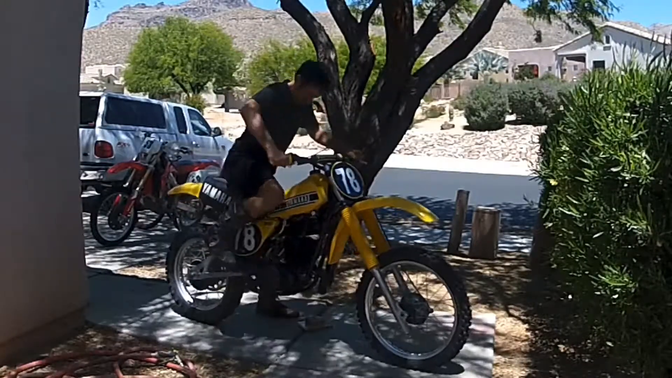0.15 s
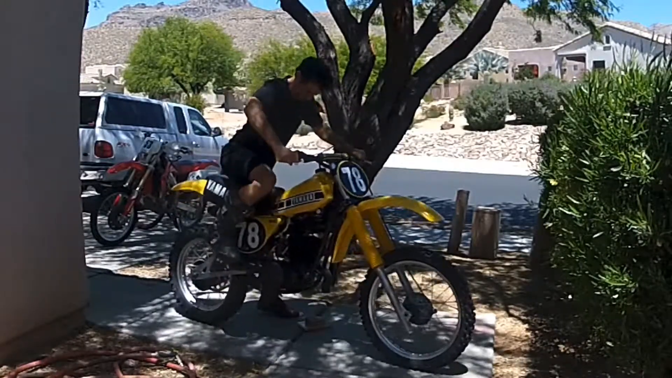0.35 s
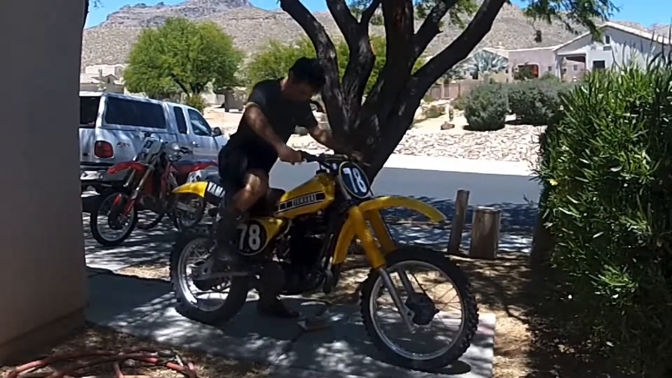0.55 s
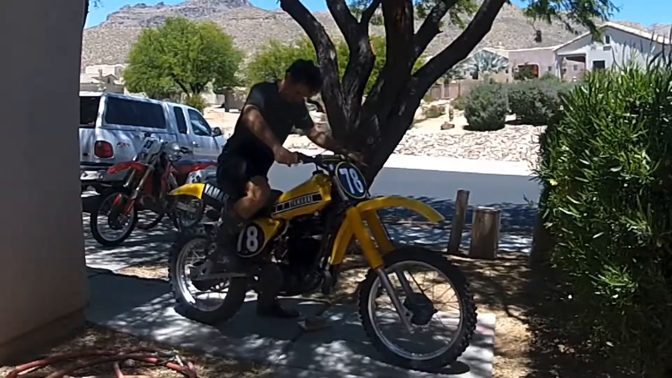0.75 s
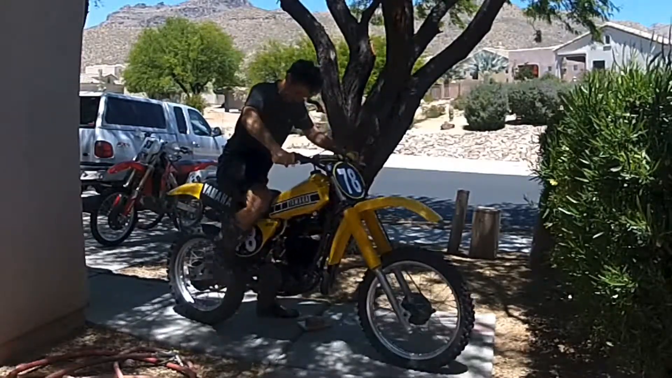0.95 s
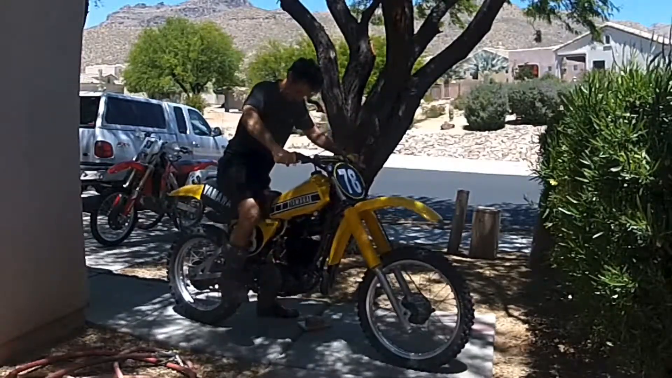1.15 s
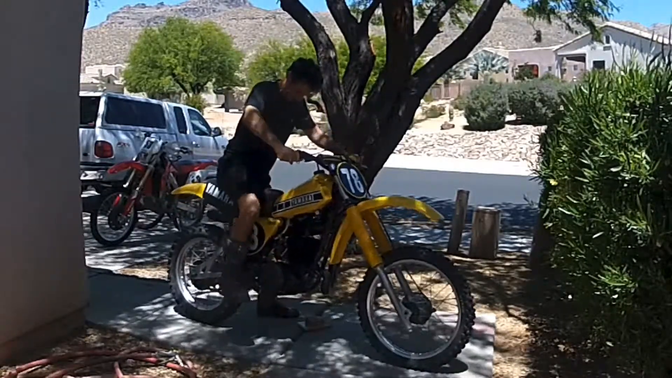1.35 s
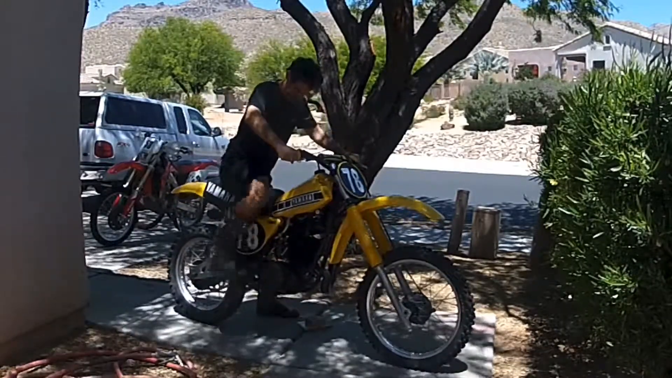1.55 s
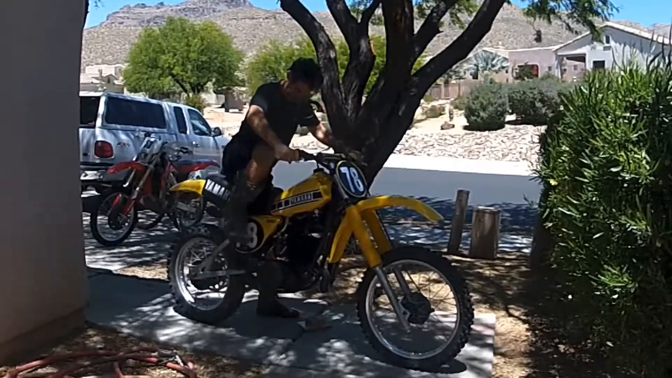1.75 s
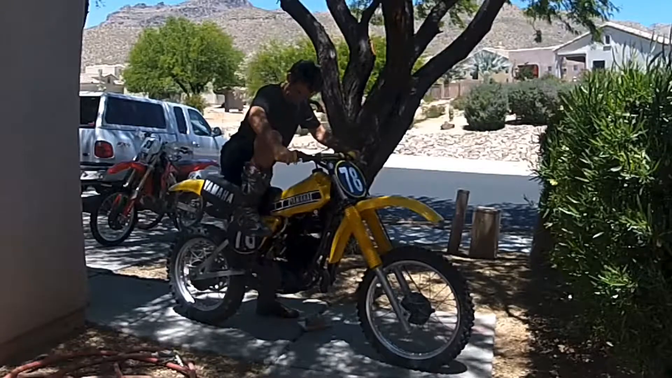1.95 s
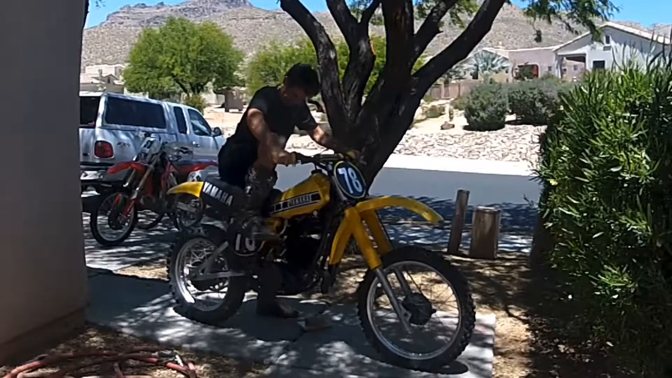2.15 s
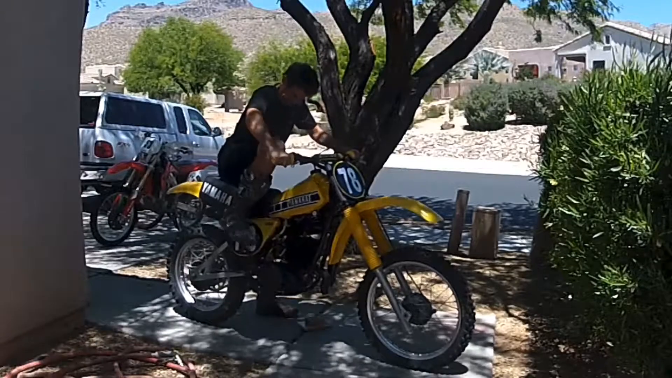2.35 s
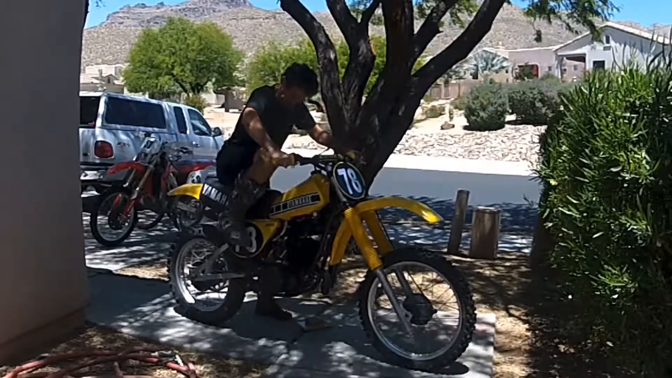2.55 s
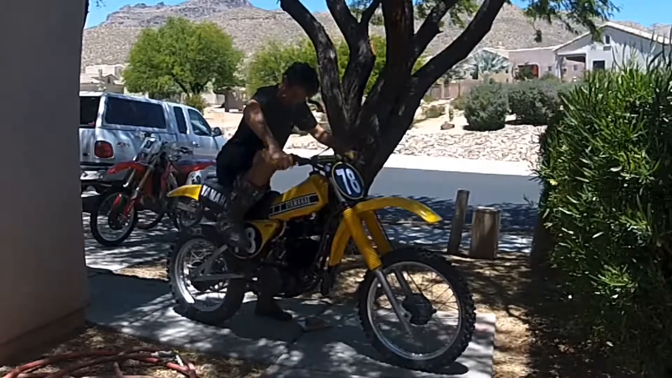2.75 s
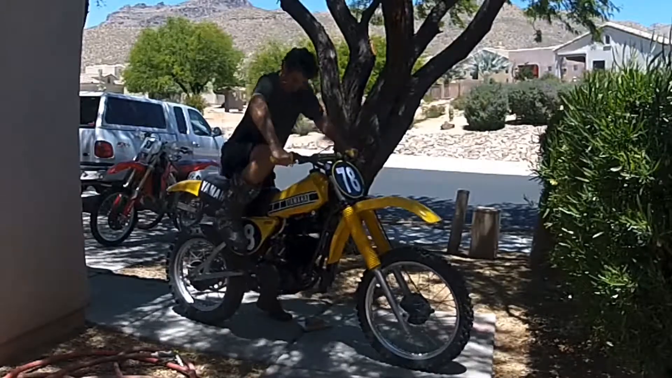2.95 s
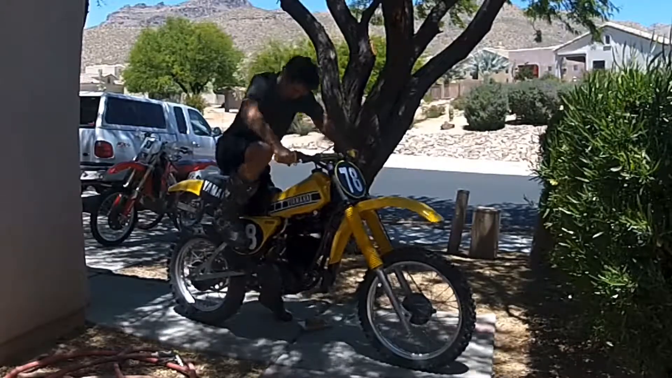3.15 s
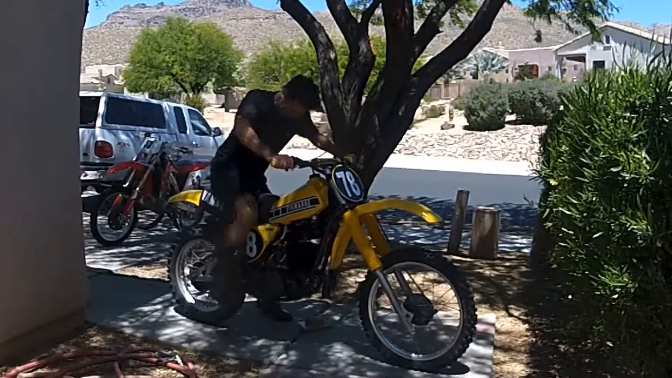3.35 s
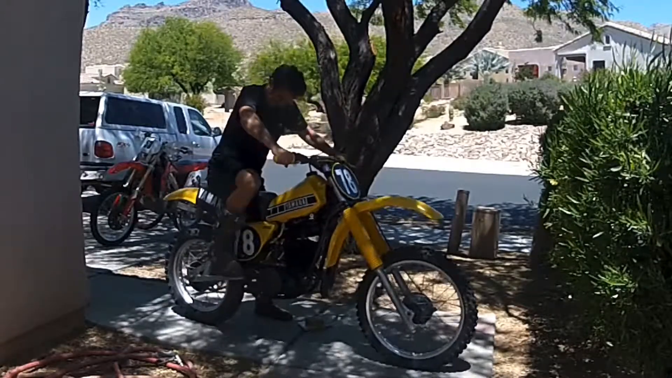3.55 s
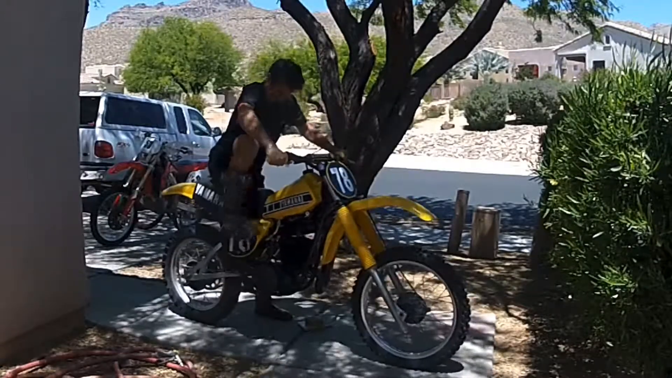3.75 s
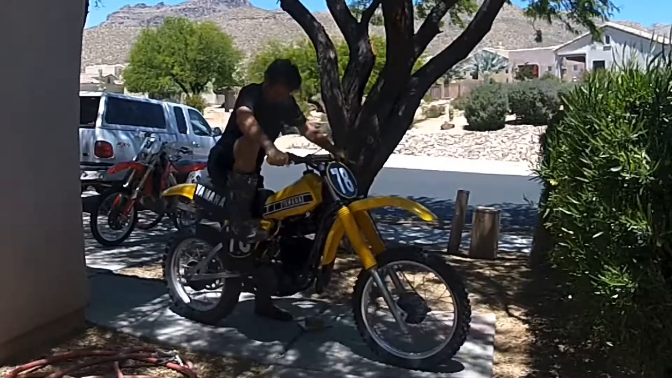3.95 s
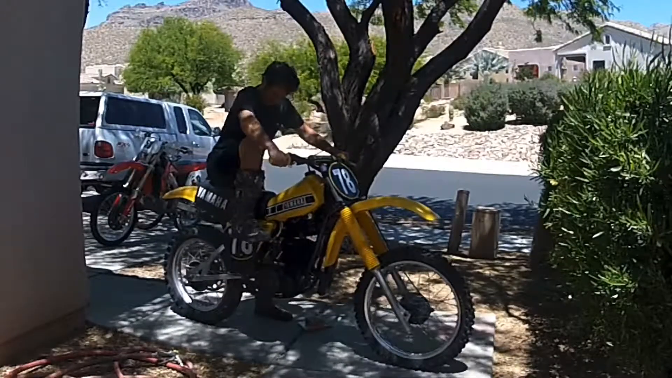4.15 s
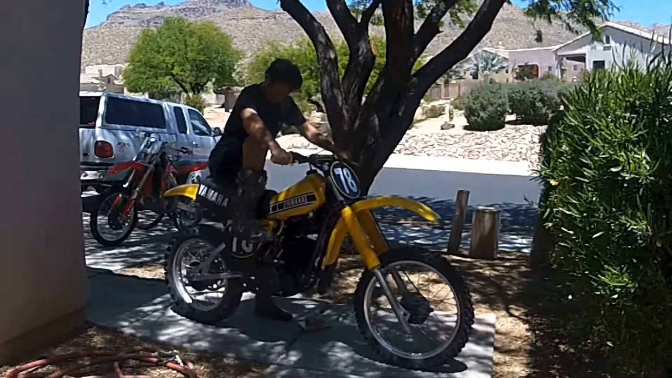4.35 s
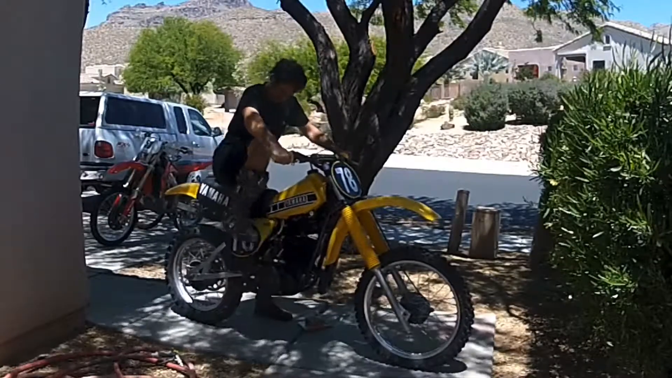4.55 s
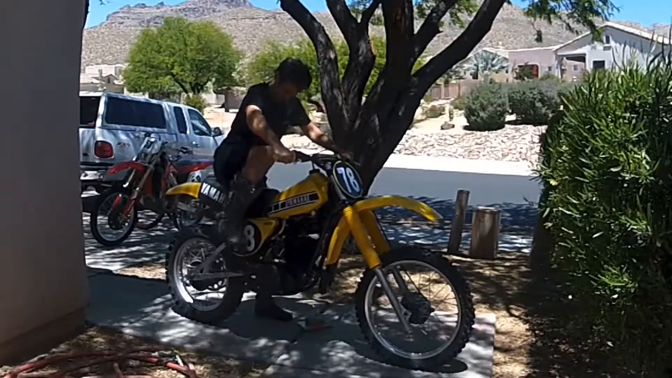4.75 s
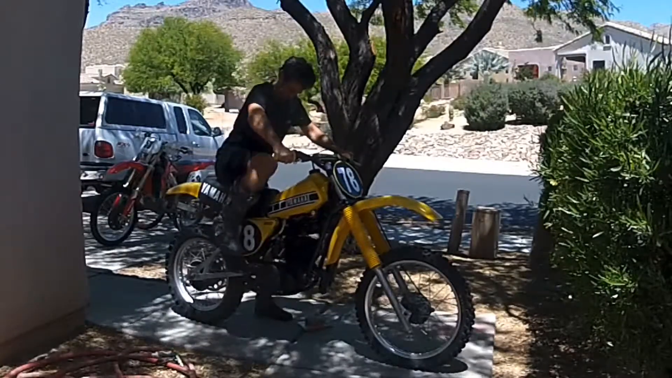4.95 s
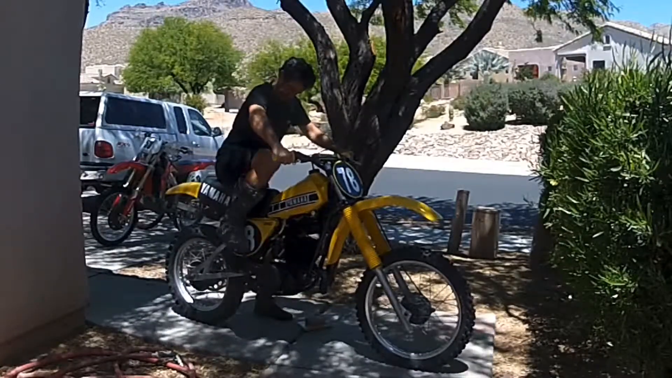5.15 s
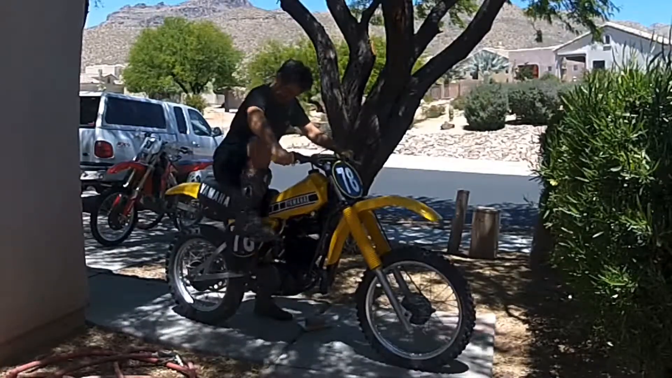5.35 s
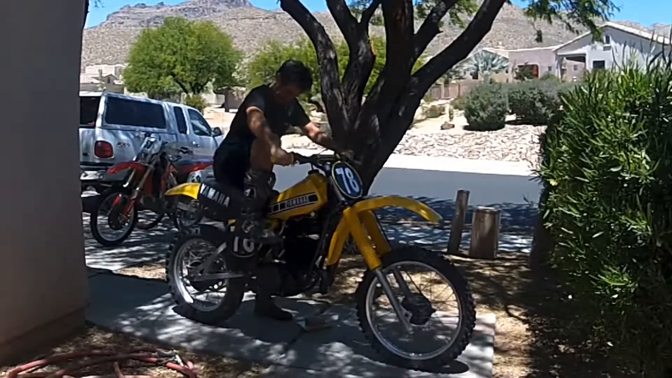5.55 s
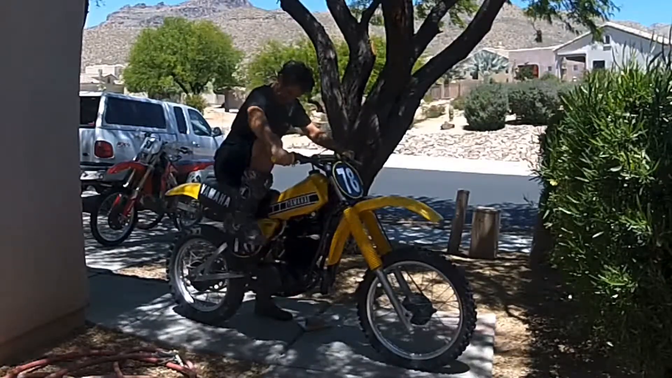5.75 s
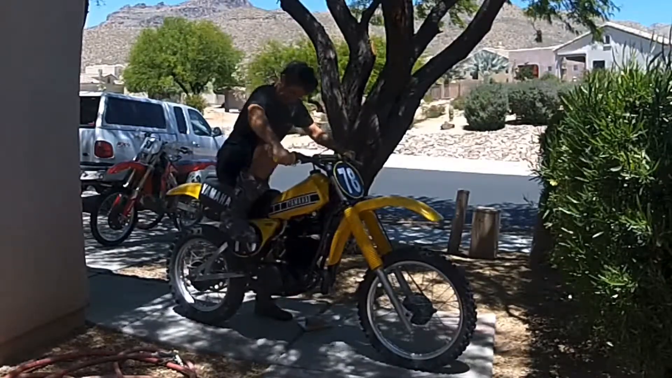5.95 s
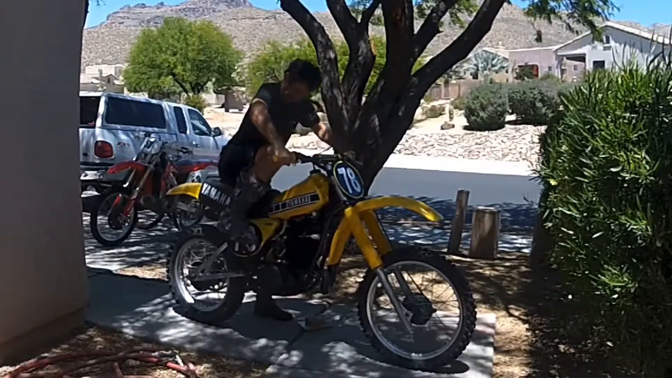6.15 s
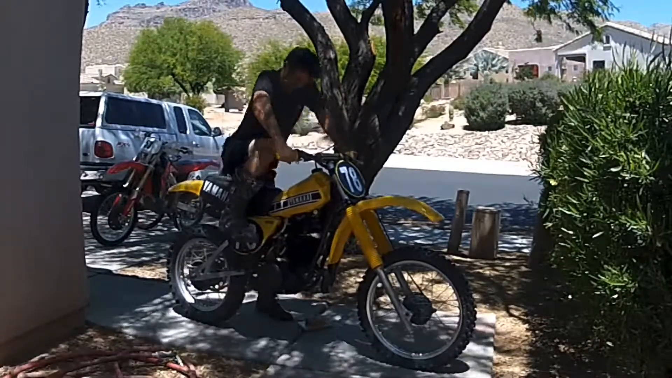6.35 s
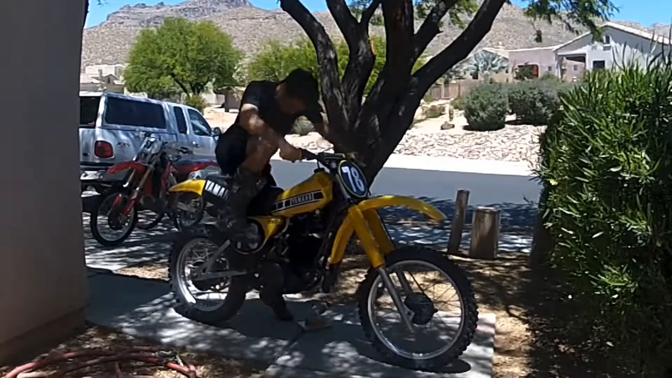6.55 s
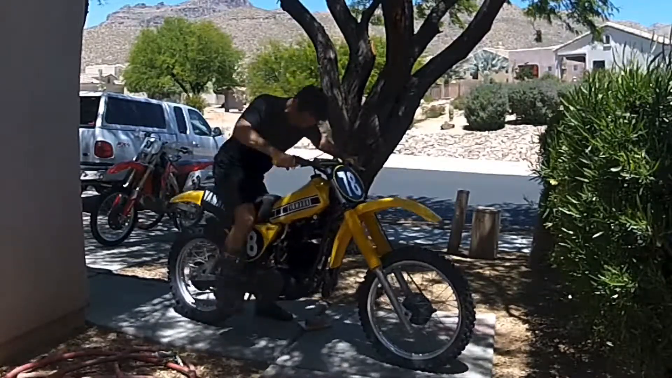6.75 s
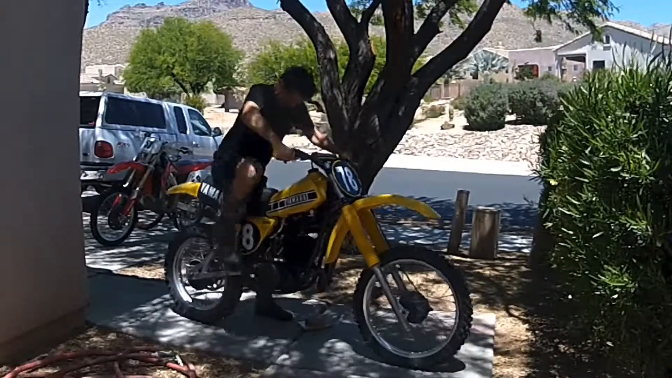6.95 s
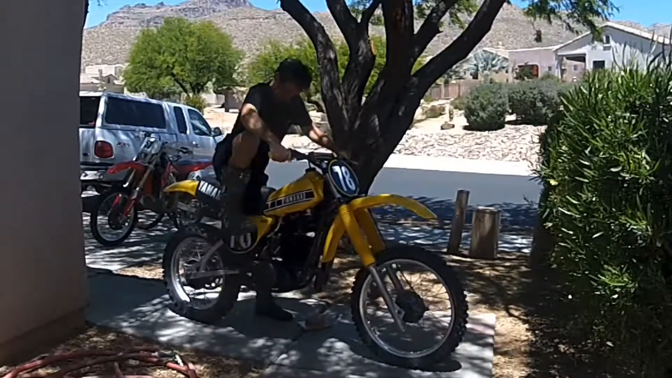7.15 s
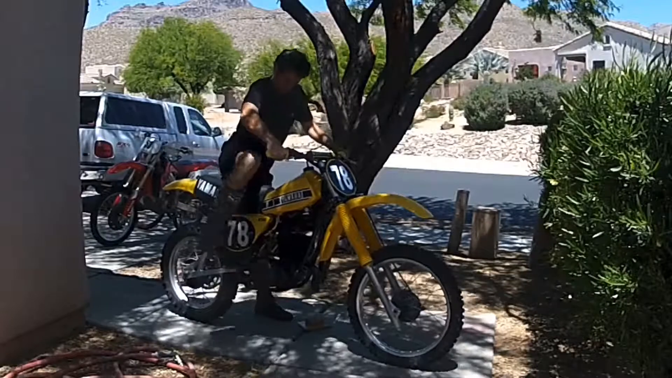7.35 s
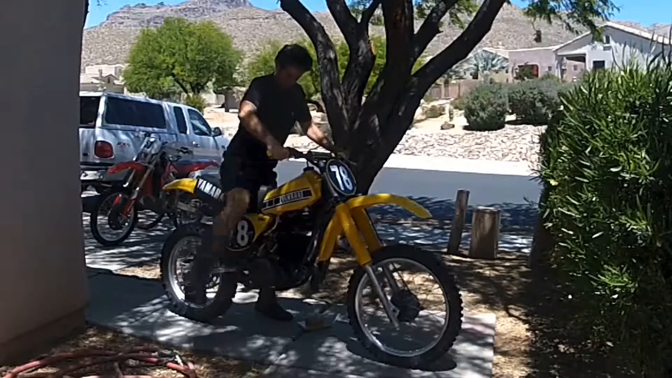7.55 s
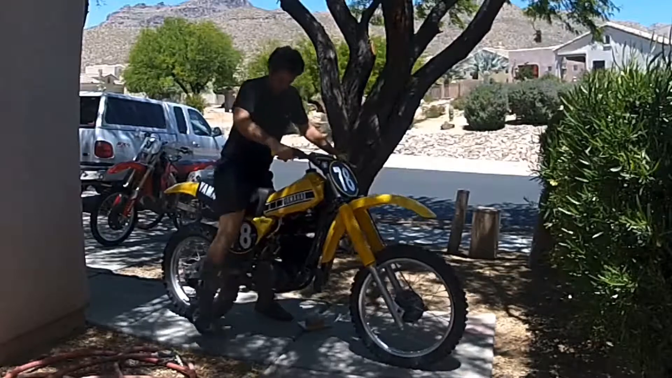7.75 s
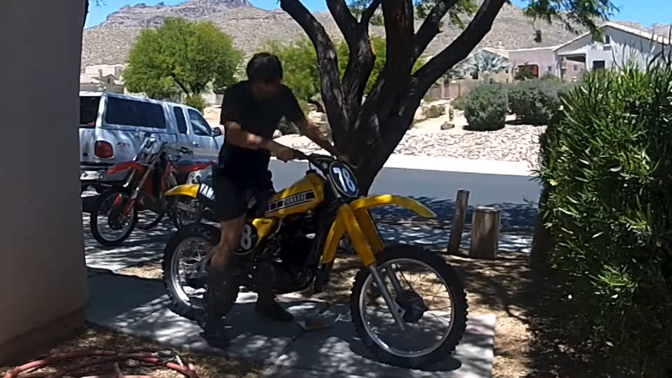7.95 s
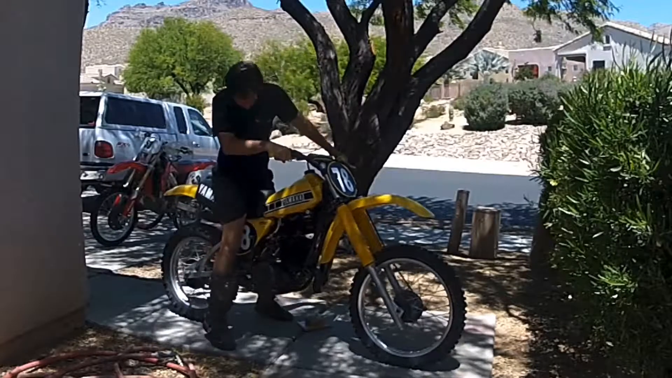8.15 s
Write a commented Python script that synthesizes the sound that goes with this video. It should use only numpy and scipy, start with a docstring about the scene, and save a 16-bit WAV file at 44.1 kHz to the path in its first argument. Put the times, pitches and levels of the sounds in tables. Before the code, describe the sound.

A dirt bike is kicked over twice without starting, with dull engine puffs, steel clanks and light ratchet clicks.

```python
"""Steel clanks and dull puffs, close by on a driveway: a two-stroke dirt bike is eased over compression,
then kicked twice without firing. The starter lever clacks on its stop and ratchets back; the piston
pumps air through pipe and airbox. A house wall answers, and a small bird chirps over far traffic.
The microphone is a camera's, whose coarse sample rate adds a glassy treble."""
import sys
import numpy as np
from scipy import signal
from scipy.fft import rfft, irfft, next_fast_len
from scipy.io import wavfile
from scipy.ndimage import uniform_filter1d

SR = 44100
rng = np.random.default_rng(int(sys.argv[2]) if len(sys.argv) > 2 else 0)


def to_wav(sig):
    """Store sig (one row per channel, or 1-D mono) as 16-bit WAV at the path in sys.argv[1].

    Samples outside -1..1 are clipped; the rate is SR.
    """
    pcm = np.clip(np.atleast_2d(sig), -1, 1) * 32767
    pcm = np.round(pcm).astype(np.int16)
    wavfile.write(sys.argv[1], SR, pcm.T)  # frames by channels


N = 362295
T = np.arange(N) / SR

# starter strokes: (pawl bites [s], strength [dB], time until the crank stops [s], one crank turn [s])
STROKES = [(0.988, -13.5, 0.12, 0.15), (3.305, -1.5, 0.36, 0.11), (6.669, -1, 0.35, 0.1)]
# the lever hits its stop: (time [s], level [dB], frame thud re level [dB], return spring gain [dB])
CLANKS = [(1.157, -30.5, 0, -59), (3.43, -24.5, -9, -63), (5.322, -46, -11, -66), (6.799, -22.5, -7.5, -56)]
# spectrum of chattering steel: (frequency [Hz], relative level [dB])
STEEL_SPECTRUM = [(300, -10.5), (900, -16.5), (1050, -12.5), (1300, 0), (1490, -6.5), (1750, 2.5),
                  (2300, 1.5), (2950, 6.5), (3500, -4.5), (4030, -2.5), (4280, -12.5), (4850, -12),
                  (5300, -22), (7000, -23.5)]
# spectrum of air pumped through the engine: (frequency [Hz], relative level [dB])
AIR_SPECTRUM = [(25, -31), (55, 0), (88, -7), (130, 4), (180, 2.5), (260, 1), (420, -10.5), (520, -6),
                (680, -12), (900, -25.5), (1500, -25.5), (4000, -71.5)]


def kickstarter():
    """Hard clanks that bounce once on the stop, thin ratchet clicks, and dull knocks under the boot."""
    # the ratchet slips a tooth as the lever comes back up:
    # (time [s], level [dB], brightness [dB], clink [Hz], relative gear ring [dB])
    ratchet_clicks = [(1.507, -47.5, 8.5, 2900, -13), (1.606, -46, 7.5, 3220, -10),
                      (1.722, -46.5, 2, 2880, -31), (1.859, -51.5, 2, 2830, -18), (3.701, -47, 6, 2956, -7),
                      (3.787, -47.5, 6.5, 2650, -6.5), (3.838, -49.5, -1, 2810, -20),
                      (4.294, -66, -7, 1860, -8), (7.019, -43.5, 3.5, 3080, -18),
                      (7.078, -47, 4.5, 1910, -12), (7.164, -44, 1, 1890, -10), (7.216, -52, -5, 3200, -25)]
    # the lever knocks under the boot: (time [s], level [dB], frame thud re level [dB])
    boot_knocks = [(0.996, -53, 10), (1.956, -63.5, 3.5), (2.402, -62, 9), (3.297, -51, 4), (3.582, -36, 3),
                   (3.61, -44, 3.5), (4.607, -67, 11.5), (5.401, -51, -0.5), (5.822, -61.5, 8),
                   (6.673, -53.5, 5), (7.235, -49, 2.5)]
    stop_hz, lever_hz = 3550, 2826
    rebound_s, rebound_db = 0.048, -20
    out = np.zeros(N)
    for s, db, thud_db, _ in CLANKS:
        for late_s, drop_db in ((0, 0), (rebound_s, rebound_db)):
            clank = steel_blow(db + drop_db, thud_db, bright_db=3.5, clink_hz=stop_hz, clink_db=-5.5,
                               case_db=-14.5, gear_db=-16.5, rise_s=0.003, length_s=0.016)
            add(out, s + late_s, clank)
    for s, db, bright_db, clink_hz, gear_db in ratchet_clicks:
        add(out, s, steel_blow(db, thud_db=-9.5, bright_db=bright_db, clink_hz=clink_hz, clink_db=-4,
                               case_db=-10, gear_db=gear_db, rise_s=0.0049, length_s=0.013))
    for s, db, thud_db in boot_knocks:
        add(out, s, steel_blow(db, thud_db, bright_db=-2, clink_hz=lever_hz, clink_db=-6.5,
                               case_db=-7, gear_db=-19, rise_s=0.006, length_s=0.011))
    return out


def steel_blow(db, thud_db, bright_db, clink_hz, clink_db, case_db, gear_db, rise_s, length_s):
    """One blow chatters through the loose steel parts for some milliseconds and leaves them ringing."""
    # thud of the frame: (frequency [Hz], relative level [dB])
    thud_spectrum = [(50, -14), (150, -27), (400, -2), (660, 1), (760, 0.5), (840, -12), (1000, -10.5),
                     (2000, -31.5)]
    # ring of engine case and lever: (frequency [Hz], relative level [dB], t60 [s])
    case_modes = [(616, 20, 0.16), (1014, 9, 0.18), (1480, -13, 0.11), (2320, -3.5, 0.27), (2414, 13, 0.38),
                  (2790, -20, 0.41), (2650, -2, 0.24), (2888, -20, 0.62), (2990, -5, 0.38),
                  (3100, -19, .22), (4030, -14, 0.172), (3950, -12, 0.18)]
    # ring of the gear: (frequency [Hz], relative level [dB], t60 [s])
    gear_modes = [(1775, -22, 0.81), (1800, -4, 0.12)]
    t = T[:SR // 3]
    spectrum = []
    for hz, level in STEEL_SPECTRUM:
        tilt_db = bright_db * np.clip(np.log2(hz / 2500), -0.5, 1)  # harder contact lifts the treble
        spot_db = 1.5 * rng.standard_normal()  # each spot struck has its own colour
        spectrum.append((hz, level + tilt_db + spot_db))
    clack = unit_attack(noise(spectrum, len(t)) * burst(t, rise_s, length_s))
    clink = unit_attack(np.sin(2 * np.pi * clink_hz * t) * burst(t, rise_s=0.003, length_s=0.011))
    thud = unit_attack(noise(thud_spectrum, len(t)) * burst(t, rise_s=0.0029, length_s=0.019))
    case = unit_attack(ring(case_modes, t, scatter_db=9, detune=0.0074))
    gear = unit_attack(ring(gear_modes, t, scatter_db=2, detune=0.001))
    ringing = undb(clink_db) * clink + undb(case_db) * case + undb(gear_db) * gear
    pressed_from_db = -60.5  # above this level the boot presses on the lever and damps its ring
    damping_db = -0.19 * max(db - pressed_from_db, 0)
    return undb(db) * (clack + undb(thud_db) * thud + undb(damping_db) * ringing)


def piston():
    """On each turn of the crank the piston uncovers its ports: the faster, the louder and more barking."""
    # puffs within one turn, at full speed: (position [share of the turn], boom [dB], bark [dB])
    ports = [(0, -28, -24), (0.12, -29, -27.5), (0.369, -34, -27), (0.799, -33, -31.5)]
    first_puff_s, max_turns = 0.049, 4
    boom_power, bark_power = 0.33, 2.36  # amplitude as a power of crank speed
    out = np.zeros(N)
    for s, db, length_s, turn_s in STROKES:
        for turn in range(max_turns):
            for share, boom_db, bark_db in ports:
                after_s = first_puff_s + (turn + share) * turn_s
                if after_s < length_s:
                    speed_db = 20 * np.log10(crank_speed(after_s, length_s))
                    add(out, s + after_s, puff(boom_db + db + boom_power * speed_db,
                                               bark_db + bark_power * (db + speed_db)))
    return out


def puff(boom_db, bark_db):
    """A slug of air booms in the pipe and barks in the airbox; the resonances shift from puff to puff."""
    # boom of the exhaust pipe: (frequency [Hz], relative level [dB], t60 [s])
    pipe_modes = [(53.2, -18.5, 0.12), (94.3, 4, 0.086), (169.3, -4.5, 0.25), (209.1, -3, 0.31),
                  (254.8, -9, 0.14)]
    # bark of the airbox: (frequency [Hz], relative level [dB], t60 [s])
    airbox_modes = [(302.4, 2.5, 0.16), (347, -3, 0.23), (380.2, 0.5, 0.2), (451, -2, 0.24),
                    (574, -5.5, 0.072), (665.3, -2.5, 0.095), (850, -29.5, 0.43)]
    t = T[:SR // 2]
    onset = 1 - np.exp(-t / 0.00094)
    boom = unit_attack(onset * ring(pipe_modes, t, scatter_db=2.5, detune=0.06))
    bark = unit_attack(onset * ring(airbox_modes, t, scatter_db=4.0, detune=0.0287))
    gust = unit_attack(noise(AIR_SPECTRUM, len(t)) * burst(t, rise_s=0.0015, length_s=0.015))
    return undb(boom_db) * (boom + undb(-5.06) * gust) + undb(bark_db) * bark


def crank_speed(t, length_s):
    """One arch of speed, 0-1, t seconds after the bite: the boot drives it up, compression brings it down."""
    share = np.clip(t / length_s, 0, 1)
    return 4 * share * (1 - share)


def cranking():
    """While the crank spins, air churns and the primary gears rattle; the bike rocks with a low shudder."""
    lead_s = 0.061  # the bike takes the rider's weight just before the pawl bites
    spin, rock = np.zeros(N), np.zeros(N)
    for s, db, length_s, _ in STROKES:
        spin += undb(db) * crank_speed(T - s, length_s)
        rock += undb(db) * burst(np.maximum(T - s + lead_s, 0), rise_s=0.078, length_s=0.53)
    grit = rng.standard_normal(N) * undb(2.9 * wander(400))
    rattle = (undb(-52) * spin + undb(-66) * rock) * colour(grit, STEEL_SPECTRUM)
    churn = (undb(-39) * spin + undb(-42) * rock) * noise(AIR_SPECTRUM)
    return churn + rattle


def return_spring():
    """The coiled return spring holds a thin note after each clank."""
    # ring of the coil: (frequency [Hz], relative level [dB], t60 [s])
    coil_modes = [(1300, 4, 1.5), (1046, -13, 1.4)]
    out = np.zeros(N)
    for s, _, _, db in CLANKS:
        add(out, s, undb(db) * ring(coil_modes, T[:SR], scatter_db=1.5, detune=0))
    return out


def boot_scuffs():
    """The sole drags over the lever with a fine gritty chatter."""
    # drags of the sole: (time [s], length [s], level [dB])
    drags = [(0.12, 0.14, -70.5), (0.966, 0.046, -55.5), (2.252, 0.045, -62), (2.503, 0.027, -53),
             (4.545, 0.025, -66), (5.744, 0.036, -60.5)]
    out, t = np.zeros(N), T[:SR // 3]
    for s, length_s, db in drags:
        add(out, s, undb(db) * noise(STEEL_SPECTRUM, len(t)) * burst(t, rise_s=0.008, length_s=length_s))
    return out


def bird():
    """A small bird, well off the microphone, whistles thin glides with a slight quaver."""
    # notes: (time [s], length [s], start pitch [Hz], end pitch [Hz], level [dB])
    chirps = [(1.027, 0.028, 4100, 4050, -64), (1.036, 0.021, 5000, 4880, -66),
              (2.969, 0.016, 5600, 5750, -65), (2.98, 0.024, 4130, 4750, -67),
              (3.017, 0.033, 3890, 4170, -64), (3.046, 0.015, 4720, 4800, -66),
              (3.07, .03, 3600, 3440, -70), (5.966, 0.108, 4520, 4330, -78), (6.278, 0.03, 4100, 3940, -70),
              (6.531, 0.097, 4180, 3960, -68.5)]
    out, quaver = np.zeros(N), wander(300)
    for s, length_s, start_hz, end_hz, db in chirps:
        size, start = int(length_s * SR), int(s * SR)
        hz = np.linspace(start_hz, end_hz, size) * (1 + 0.024 * quaver[start:start + size])
        whistle = np.sin(2 * np.pi * np.cumsum(hz) / SR)
        add(out, s, undb(db) * np.hanning(size) ** 0.5 * whistle)
    return out


def far_traffic():
    """Far traffic rumbles and drones under a smooth hiss."""
    # traffic as it reaches the driveway: (frequency [Hz], relative level [dB])
    traffic_spectrum = [(12, -30), (20, -15.5), (41, -3), (60, -4.5), (91, 2), (119, -4), (150, -1.5),
                        (259, -4.5), (313, -9.5), (353, -12.5), (686, -24), (754, -26.5), (1130, -33.5),
                        (4060, -39), (5800, -44.5), (7540, -106), (12800, -120)]
    # slow swell of rumble and drone: (time [s], level [dB])
    swell_curve = [(0, -49.5), (2.3, -48), (4.4, -50), (5.1, -46.5), (5.7, -49.5), (8.2, -51)]
    drone_hz = 91
    wash = noise(traffic_spectrum)
    rumble = signal.sosfiltfilt(signal.butter(2, 600, fs=SR, output="sos"), wash)
    hiss = wash - rumble
    swell = undb(np.interp(T, *np.transpose(swell_curve)) + 0.8 * wander(9))
    phase = 2 * np.pi * np.cumsum(drone_hz * (1 + 0.02261 * wander(5.7))) / SR
    drone = undb(-12.5 + 3 * wander(6)) * np.sin(phase)
    octave = undb(-13.5 + 3 * wander(6)) * np.sin(2 * phase)
    return swell * (undb(-2) * rumble + drone + octave) + undb(-48) * hiss


def driveway(x, wet_db, t60_s, gap_s):
    """House wall, slab and tree scatter a short dense tail back to the microphone."""
    t = T[:SR // 2]
    build_up = 1 - np.exp(-(t / gap_s) ** 2)
    tail = rng.standard_normal(len(t)) * np.exp(-np.log(1000) * t / t60_s) * build_up
    return x + undb(wet_db) * signal.fftconvolve(x, tail / np.linalg.norm(tail))[:N]


def undb(db):
    """Decibels to gain."""
    return 10 ** (np.asarray(db) / 20)


def unit(x):
    """Scale to rms 1."""
    return x / np.sqrt(np.mean(x ** 2))


def unit_attack(x):
    """Scale a blow to rms 1 over its first 18 ms."""
    return x / np.sqrt(np.mean(x[:int(0.018 * SR)] ** 2))


def add(out, s, x):
    """Mix x into out from s seconds on."""
    start = max(int(s * SR), 0)
    out[start:start + len(x)] += x[:len(out) - start]


def colour(x, spectrum):
    """Filter x by a curve of (frequency [Hz], level [dB]) points and scale it to rms 1."""
    hz, db = np.transpose(spectrum)
    size = next_fast_len(len(x))
    bin_hz = np.maximum(np.fft.rfftfreq(size, 1 / SR), 1)
    gain = undb(np.interp(np.log(bin_hz), np.log(hz), db))
    return unit(irfft(rfft(x, size) * gain, size)[:len(x)])


def noise(spectrum, size=N):
    """Noise with the given spectrum, at rms 1."""
    return colour(rng.standard_normal(size), spectrum)


def wander(rate_hz):
    """Random drift at rms 1 that heads for a new value rate_hz times a second."""
    hold = int(SR / rate_hz)
    steps = np.repeat(rng.standard_normal(N // hold + 1), hold)
    return unit(uniform_filter1d(steps, hold)[:N])


def ring(modes, t, scatter_db, detune):
    """A sum of decaying modes; every blow meets them with a different tuning, sign and level."""
    hz, db, t60 = np.transpose(modes)[:, :, None]
    tuning, sign, strength = rng.standard_normal((3, len(modes), 1))
    swing = np.sin(2 * np.pi * hz * (1 + detune * tuning) * t + np.pi * (sign > 0))
    decay = np.exp(-np.log(1000) * t / t60)
    return (undb(db + scatter_db * strength) * swing * decay).sum(axis=0)


def burst(t, rise_s, length_s):
    """A quick swell that holds briefly and collapses."""
    return (1 - np.exp(-t / rise_s)) * np.exp(-(t / length_s) ** 2)


def scene():
    """From one spot on the driveway, in mono: the bike near, the bird farther off, traffic behind."""
    lever = driveway(kickstarter() + boot_scuffs(), wet_db=-5.5, t60_s=0.29, gap_s=0.012)
    spring = return_spring()
    engine = driveway(piston() + cranking(), wet_db=-10.0, t60_s=0.26, gap_s=0.0048)
    song = driveway(bird(), wet_db=3.5, t60_s=0.17, gap_s=0.01)
    return (lever + spring + engine + song + far_traffic())[None]


def record(dry):
    """The camera holds each coarse sample for four ticks, which mirrors the sound into the treble."""
    coarse_hz, ticks, cutoff_hz = 12000, 4, 15500
    coarse = signal.resample_poly(dry, coarse_hz, SR, axis=1)
    stairs = np.repeat(coarse, ticks, axis=1)
    held = signal.resample_poly(stairs, SR, ticks * coarse_hz, axis=1)[:, :N]
    return signal.sosfilt(signal.ellip(8, 0.2, 70, cutoff_hz, fs=SR, output="sos"), held)


dry = scene()
out = record(dry)
to_wav(out)
```